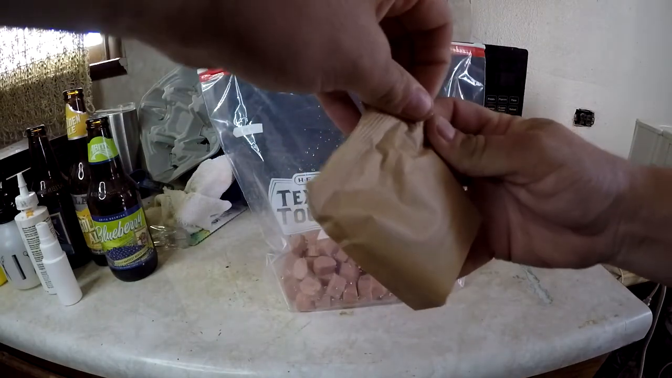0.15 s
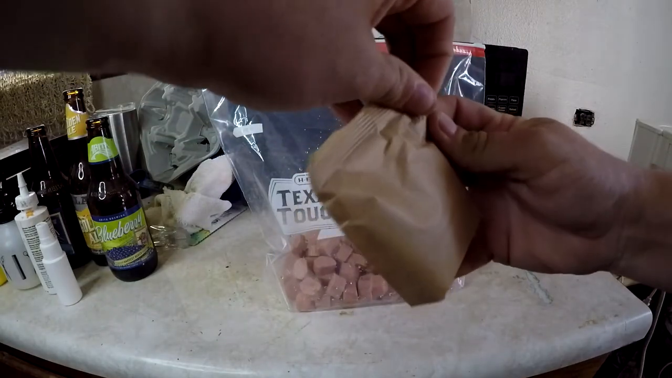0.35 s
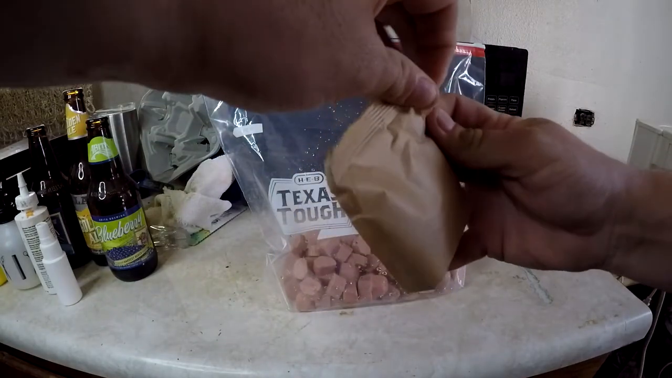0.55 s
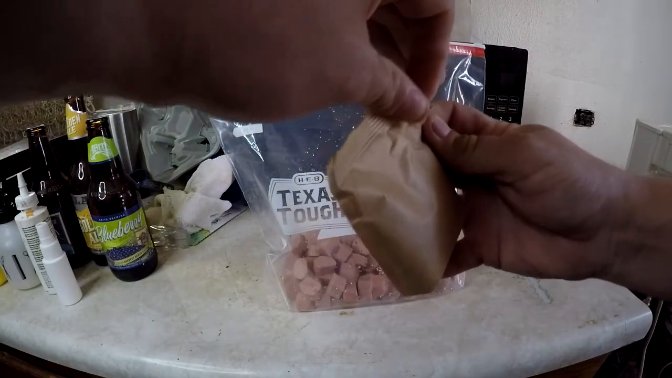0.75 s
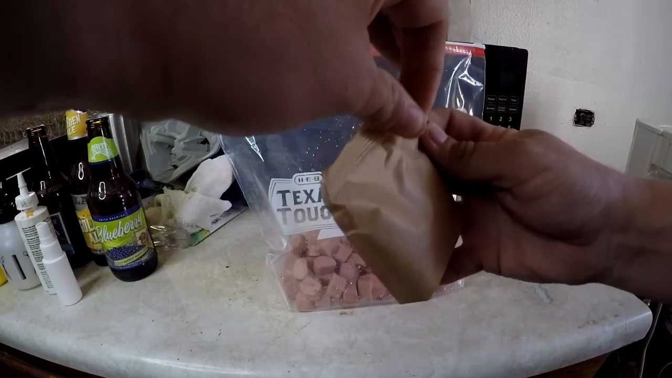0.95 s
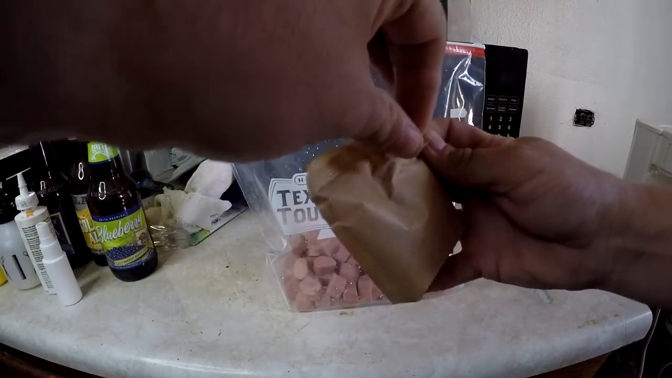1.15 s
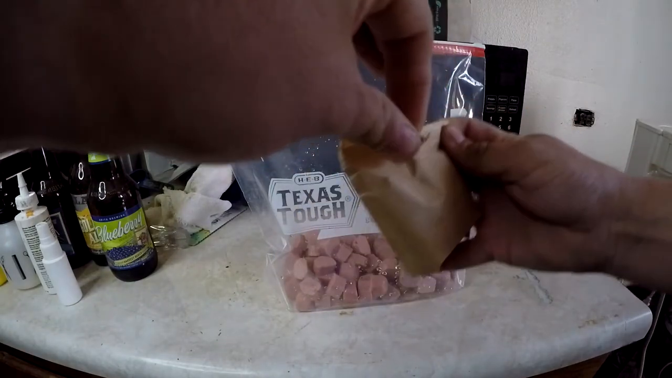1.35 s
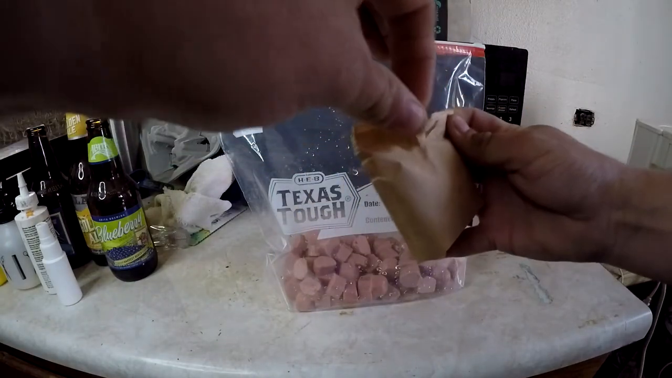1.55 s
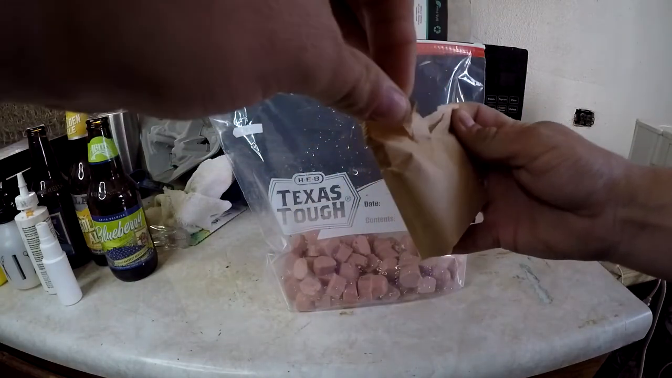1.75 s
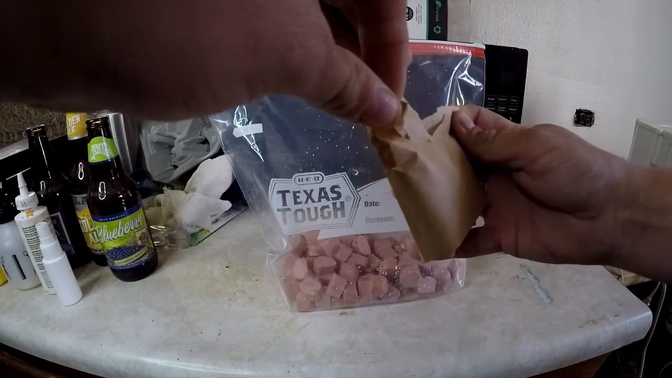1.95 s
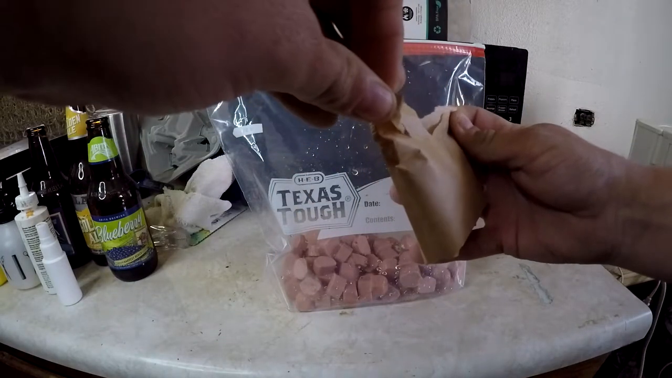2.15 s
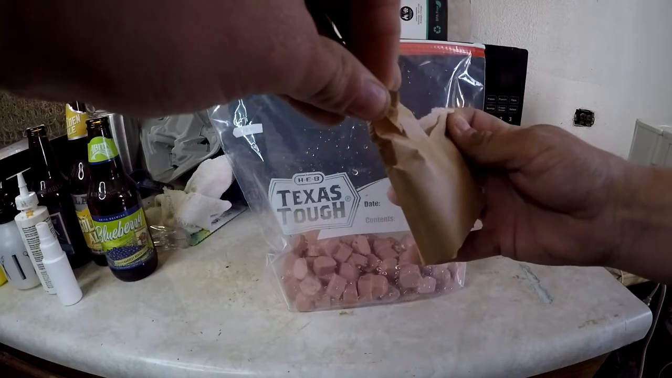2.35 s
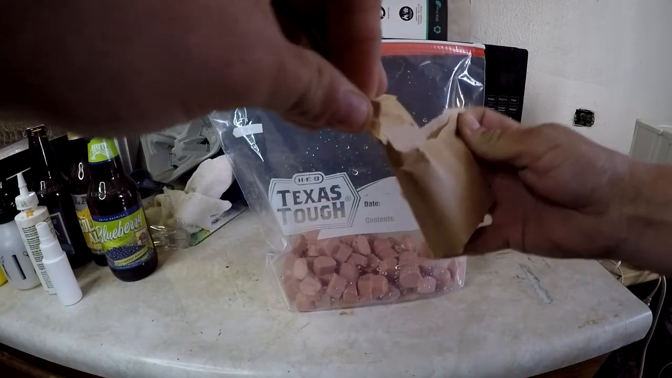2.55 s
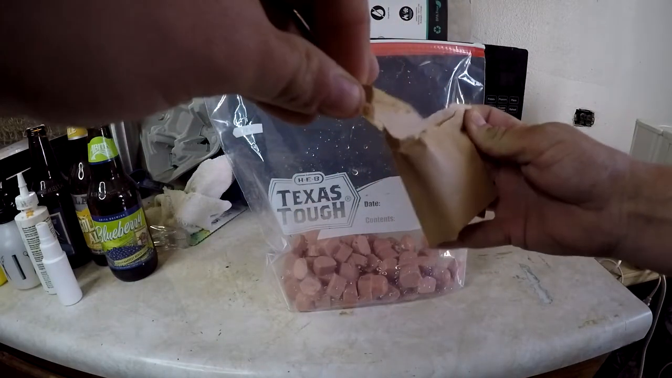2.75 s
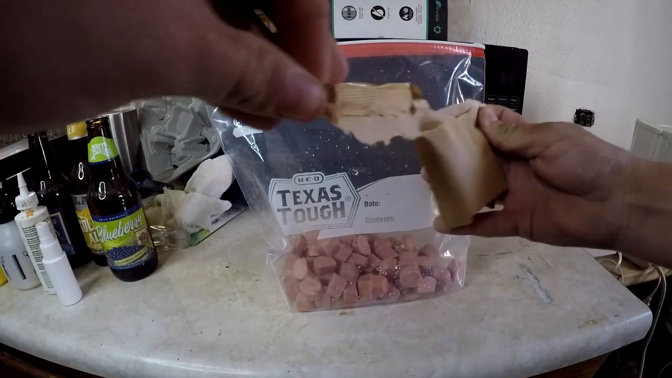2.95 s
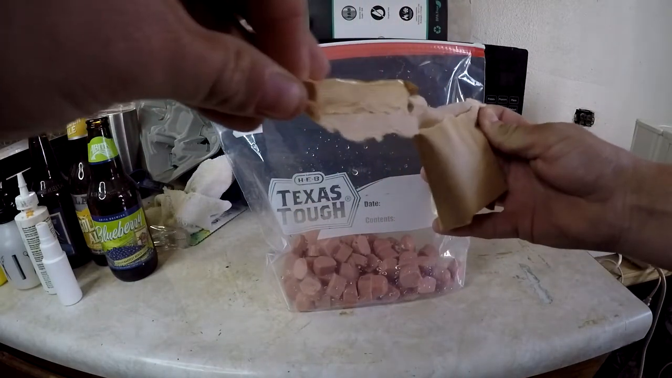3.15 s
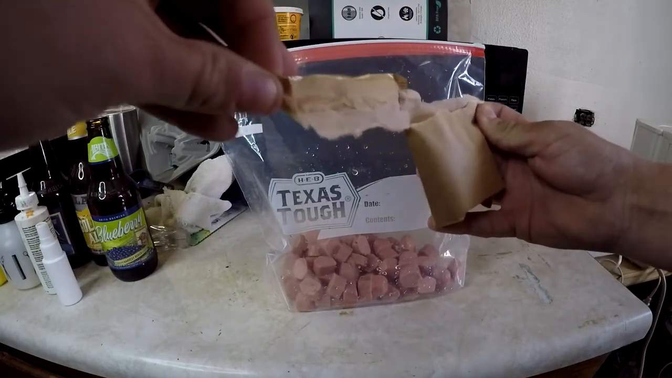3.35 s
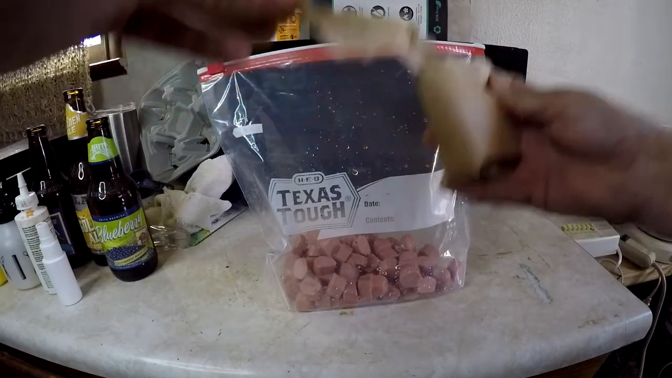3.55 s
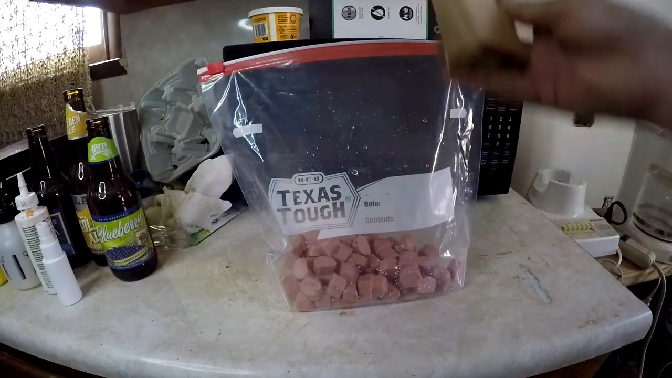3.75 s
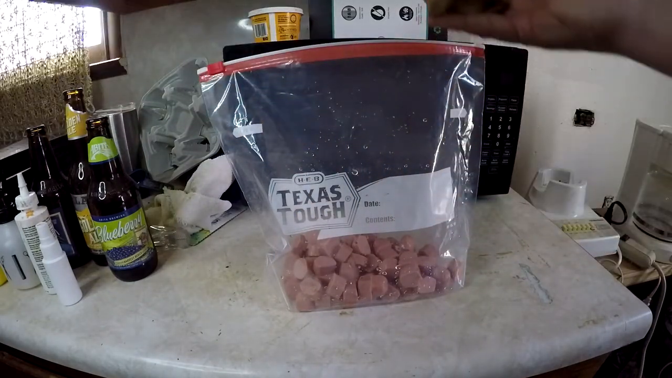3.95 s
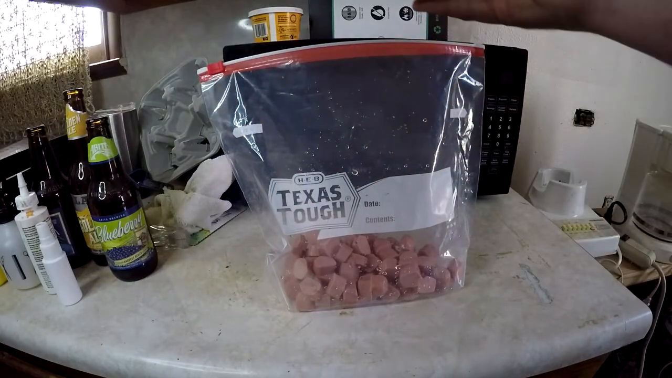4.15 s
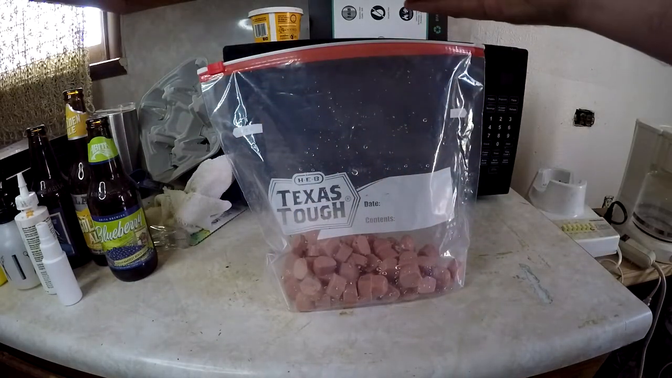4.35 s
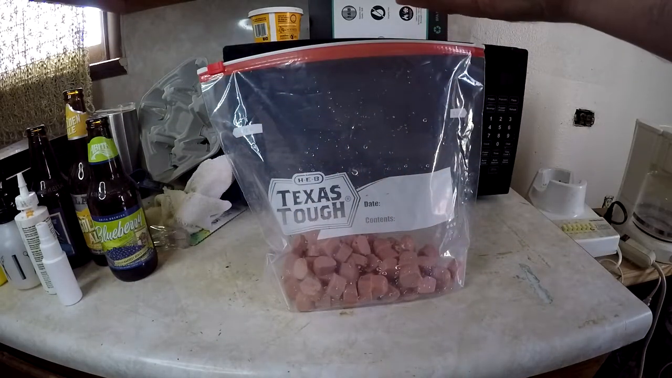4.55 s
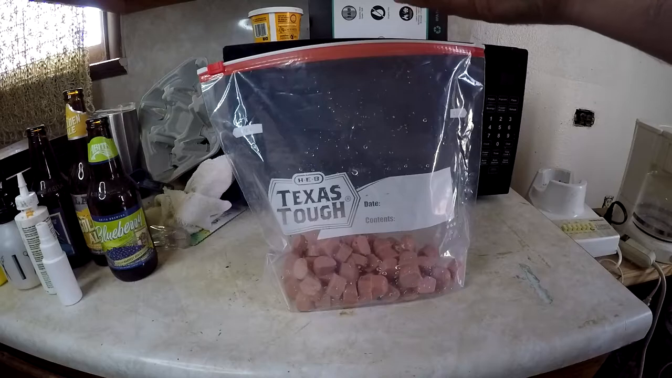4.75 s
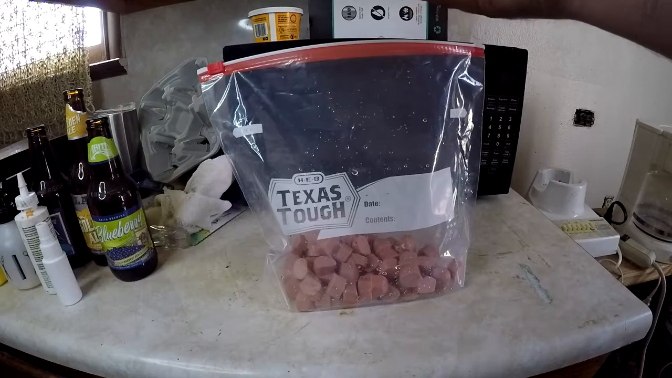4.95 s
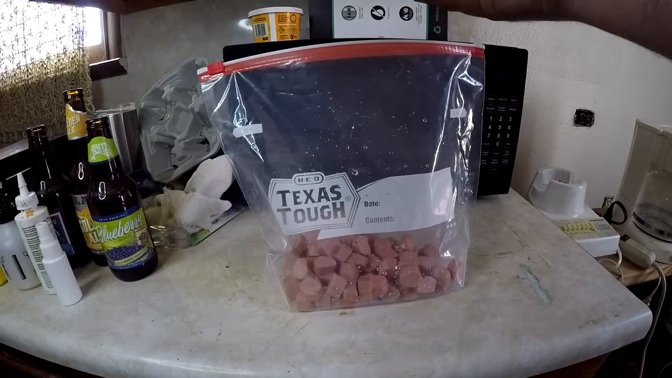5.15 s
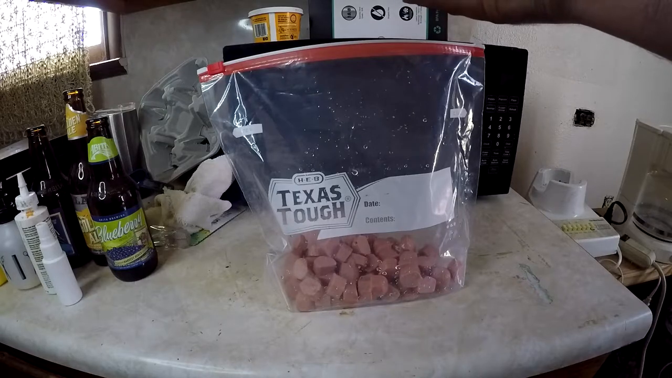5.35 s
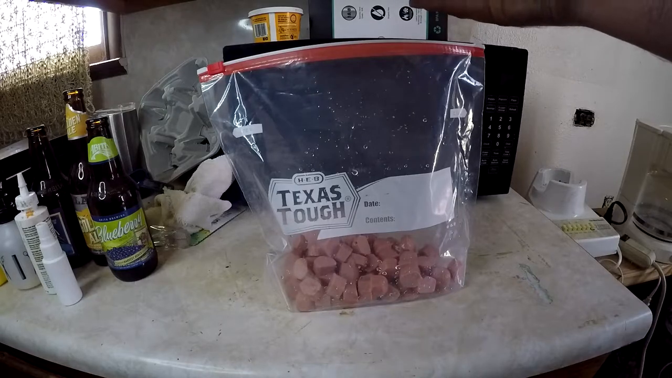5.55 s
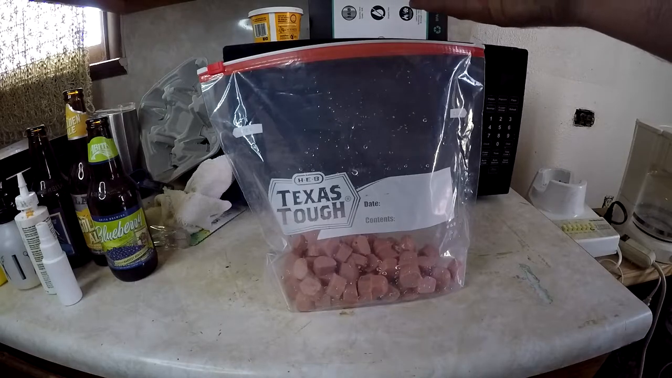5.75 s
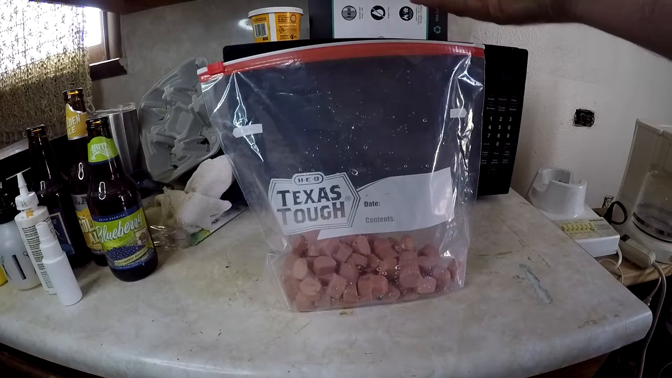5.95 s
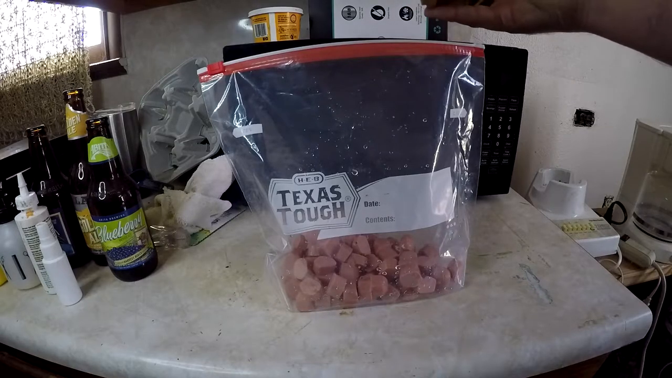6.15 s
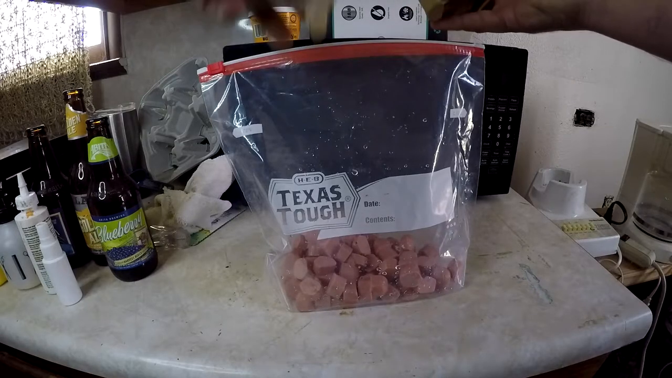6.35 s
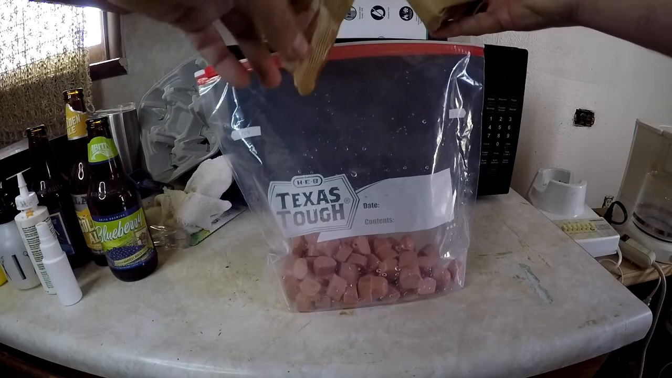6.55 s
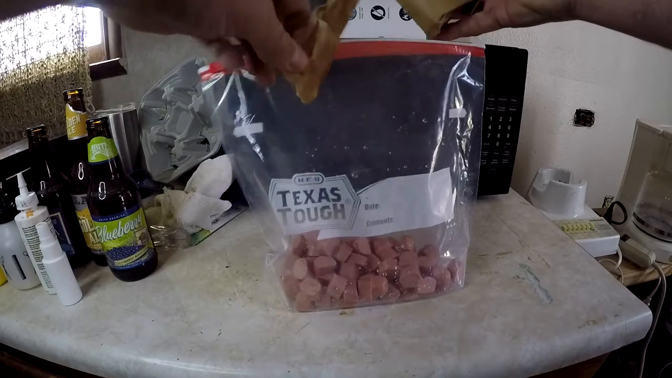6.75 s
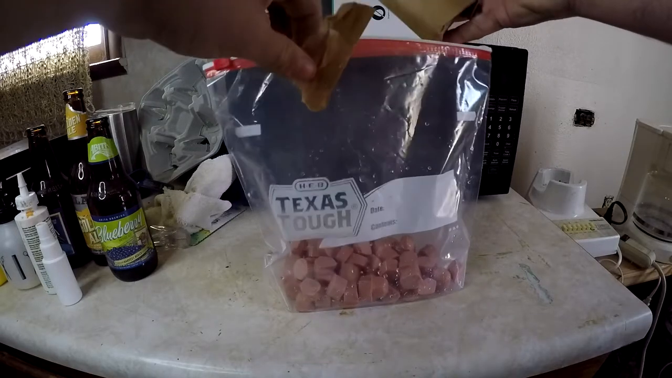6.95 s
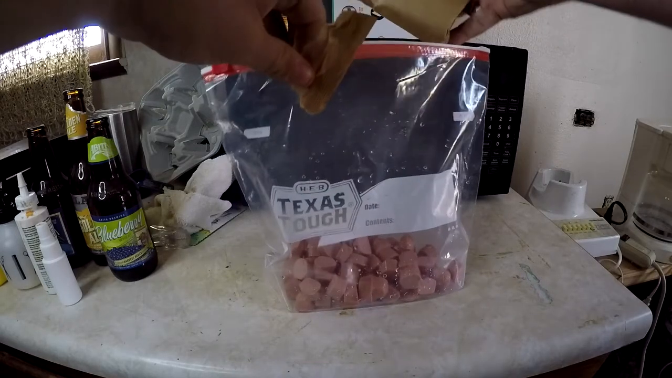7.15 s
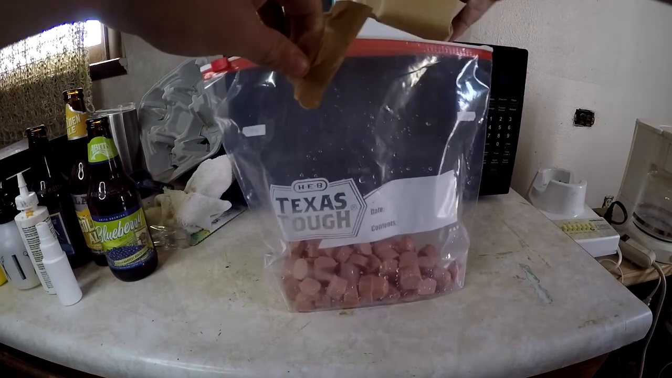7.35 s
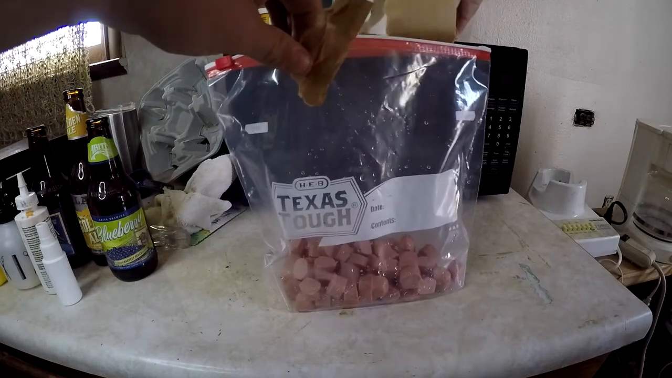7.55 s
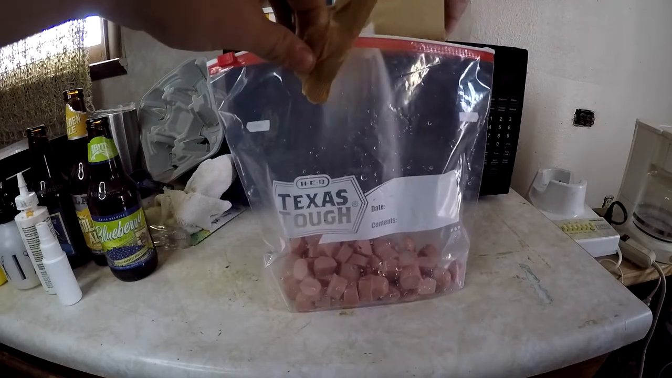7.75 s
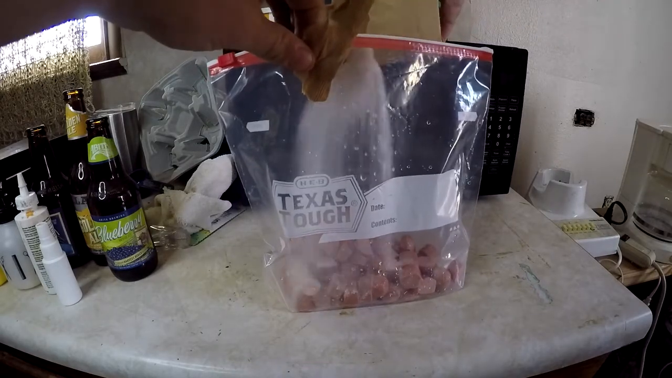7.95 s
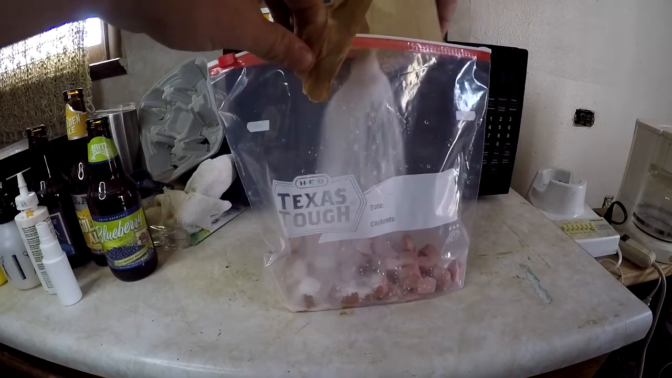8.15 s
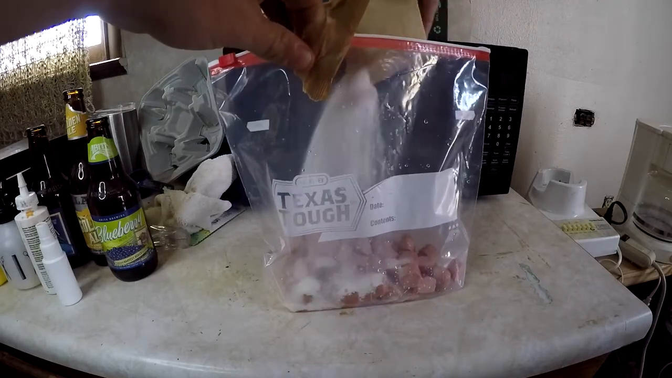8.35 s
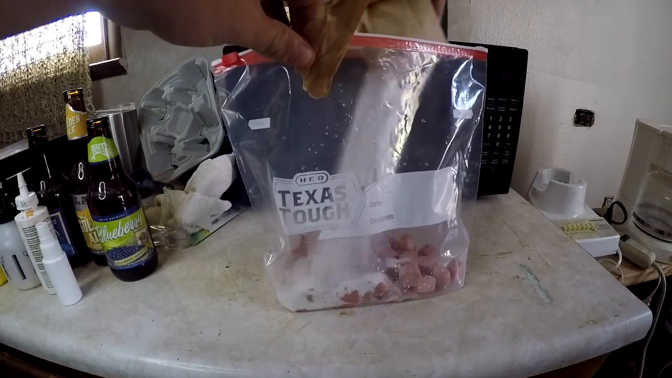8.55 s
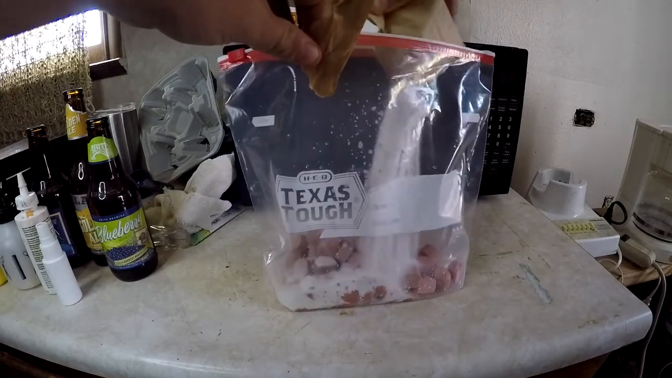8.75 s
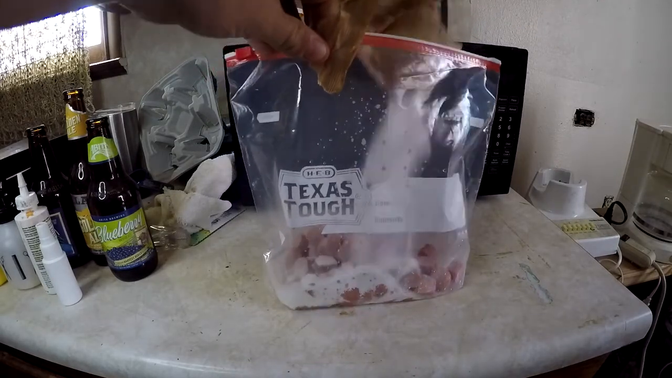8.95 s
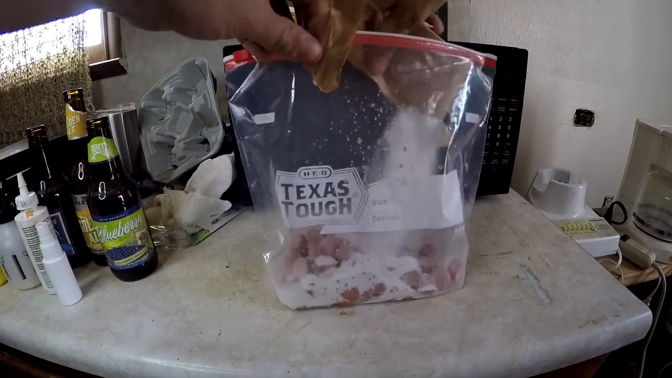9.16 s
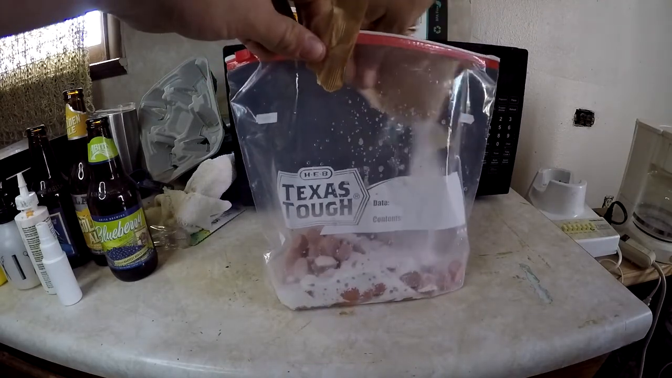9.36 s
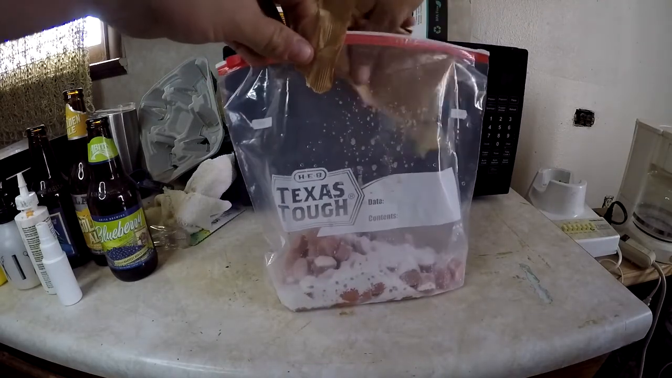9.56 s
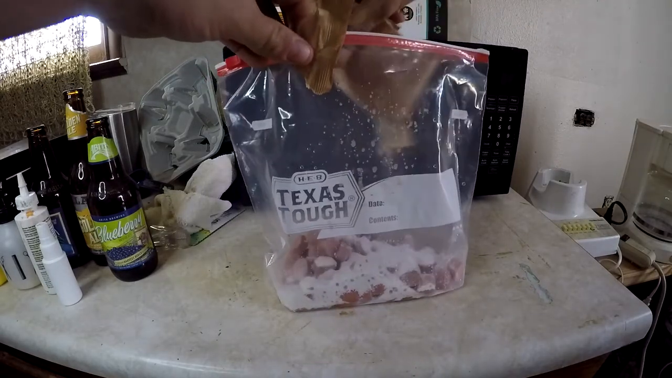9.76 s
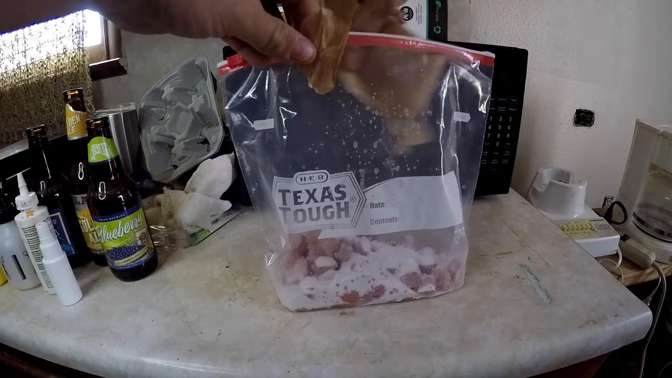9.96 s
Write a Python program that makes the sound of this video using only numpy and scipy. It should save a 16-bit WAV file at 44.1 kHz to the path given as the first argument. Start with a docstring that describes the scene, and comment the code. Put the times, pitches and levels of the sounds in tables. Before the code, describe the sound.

Crisp paper packet crinkled and torn close up in a kitchen, then sparser crackles, and powder hissing into a plastic bag.

```python
"""Hands crinkle and tear a paper packet close to one microphone in a kitchen: creases buckle as clicks
that ring the sheet briefly, loudest in the first three seconds, then sparser, with soft low bumps.
From about five seconds the packet's hollow ring fades as the hands turn to a plastic bag, a duller film.
From seven seconds powder pours in, its grains fusing to a hiss on the film while the sheets still crackle.
Throughout, filtered noise makes a low rumble and a faint steady hiss, and the room adds a short tail."""
import sys
import numpy as np
from scipy import signal
from scipy.fft import rfft, irfft
from scipy.io import wavfile

SR = 44100
rng = np.random.default_rng(int(sys.argv[2]) if len(sys.argv) > 2 else 0)


def wav_record(signal):
    """Record a signal, one row per channel, as 16-bit PCM in the file named by sys.argv[1]."""
    frames = np.transpose(np.atleast_2d(signal))
    bounded = np.clip(frames, -1, 1)
    # unit amplitude maps onto the largest positive 16-bit level
    quanta = np.round(bounded * 32767).astype(np.int16)
    wavfile.write(sys.argv[1], SR, quanta)


N = 441000

# loud buckles of paper and film:
# (time [s], relative peak level [dB], pitch [Hz], relative sheen of the treble [dB])
SNAP_EVENTS = [(0.014, -20.5, 920, -42), (0.311, -45, 6440, -12), (0.397, -9.5, 2710, -19),
               (0.428, -30, 5680, -23), (0.443, -15, 6080, -25), (0.503, -18, 5570, -23),
               (0.554, -16, 5890, -17), (0.563, -13.5, 5900, -21), (0.658, -19.5, 6100, -11),
               (0.702, 0.5, 3900, -32), (0.719, 2.5, 3200, -19), (0.787, -11.5, 3580, -26),
               (0.82, -8.5, 3340, -14), (0.832, -13, 3300, -21), (0.949, -49, 2330, -25),
               (1.041, -15.5, 3360, -19), (1.061, -16.5, 6620, -13), (1.076, -17, 3300, -17),
               (1.096, -16, 2750, -29), (1.109, -8, 3820, -26), (1.121, 5, 2680, -31),
               (1.165, -5.5, 4540, -6), (1.216, -5, 3670, -14.5), (1.231, -12, 5240, -26),
               (1.289, 0, 4200, -19), (1.309, -1, 4040, -15), (1.337, 4, 4200, -30),
               (1.411, -12, 4260, -17), (1.463, -23.5, 5180, -12), (1.517, -23, 3430, -11),
               (1.561, -11, 4240, -22), (1.6, -14.5, 4030, -29), (1.704, -16, 5940, -8),
               (1.733, -16, 3410, -22), (1.784, -18, 2600, -31), (1.814, -21.5, 4450, -8),
               (1.876, -13, 790, -23), (1.922, -28, 2600, -5), (1.941, -16.5, 2240, -29),
               (1.975, -26, 2290, -17), (2.032, -17.5, 5960, -15), (2.057, -19.5, 4210, -20),
               (2.091, 1, 2630, -18.5), (2.154, -21.5, 2480, -31), (2.343, -29.5, 5930, -12),
               (2.459, -20, 5580, -10.5), (2.467, -11.5, 4180, -16), (2.484, -4, 3890, -11.5),
               (2.505, -4, 4850, -24), (2.512, -9.5, 5940, -23), (2.563, -22, 2200, -19),
               (2.646, -20, 2780, -13), (2.665, -18, 3900, -22), (2.709, -17, 3800, -25),
               (2.728, -24, 4800, -13.5), (2.74, -19, 3960, -11), (2.764, -22, 3140, -17.5),
               (2.819, -14, 5130, -7.5), (2.831, -24, 3120, -7.5), (2.852, -8, 4890, -11),
               (2.859, -10, 2625, -14.5), (2.915, -16, 2770, -20.5), (2.956, -20, 4130, -14.5),
               (2.992, -11, 3880, -19), (3.161, -34, 5700, -2), (3.173, -41, 12600, -4),
               (3.207, -33, 3590, -12), (3.219, -28, 5320, -16), (3.27, -43, 4220, -14),
               (3.252, -29.5, 895, -10), (3.336, -21.5, 790, -13.5), (3.349, -22.5, 3540, -25),
               (3.435, -33.5, 954, -42.5), (3.487, -43, 3340, -27.5), (3.646, -42, 4130, -27.5),
               (3.667, -34.5, 3460, -21), (3.747, -45, 3550, -19), (3.724, -29, 3480, -17.5),
               (3.798, -29.5, 920, -20), (3.841, -29.5, 1540, -12), (3.977, -24, 1400, -5.5),
               (4.013, -34.5, 2230, -20), (4.36, -32, 4300, -9), (4.417, -38, 2760, -18),
               (4.514, -39, 1660, -24), (4.63, -31, 2300, -34), (4.643, -19, 970, -44),
               (4.681, -20, 3530, -15.5), (4.69, -33, 2920, -29), (4.704, -24, 1760, -34),
               (4.718, -23, 2910, -27), (4.734, -27, 3490, -27), (4.802, -39, 4000, -14),
               (4.822, -23, 3200, -28), (4.853, -32, 2950, -32), (4.944, -37.5, 1620, -5),
               (5.025, -26.5, 1190, -39), (5.046, -14, 950, -31), (5.069, -24, 940, -15),
               (5.118, -39, 3180, -2), (5.145, -38, 5510, -14), (5.165, -39, 3360, -14),
               (5.199, -39, 5100, -8), (5.212, -9.5, 4140, -26), (5.241, -23.5, 1510, -24.5),
               (5.366, -32, 1500, -13), (5.38, -6.5, 3120, -16), (5.428, -5.5, 2720, -26),
               (5.498, -17.5, 4560, -30), (5.51, -9.5, 930, -41.5), (5.546, -17.5, 2730, -14),
               (5.631, -26, 2600, -52.5), (5.676, -32.5, 1590, -36.5), (5.791, -25, 1010, -35.5),
               (5.814, -16.5, 7050, -17), (5.85, -33, 1400, -26), (5.97, -14, 4290, -10),
               (5.983, -9.5, 5200, -13), (6.011, -2.5, 2580, -29), (6.611, -28.5, 1216, -47),
               (6.745, -36, 1530, -33.5), (6.794, -26, 1080, -38), (6.806, -24, 1400, -41),
               (6.879, -20.5, 3640, -37), (6.944, -18.5, 1580, -41), (6.976, -11.5, 2480, -21.5),
               (7, -21, 1390, -37), (7.034, -25, 3700, -40), (7.055, -25, 1210, -38),
               (7.071, -14.5, 4100, -29), (7.119, -32, 1290, -29), (7.136, -36, 1400, -30),
               (7.159, -28.5, 1230, -33), (7.196, -31, 2900, -32), (7.244, -30, 1470, -37),
               (7.319, -29, 1510, -38), (7.324, -39, 1010, -35), (7.396, -21, 1450, -54),
               (7.662, -18, 3700, -33), (8.041, -19, 3400, -16), (8.677, -20, 1190, -30),
               (8.745, -9.5, 1990, -26), (8.95, -17.5, 2180, -10), (8.978, -8, 2420, -18),
               (9.07, -13.5, 1420, -24), (9.135, -17, 2610, -12), (9.199, -15, 1200, -40),
               (9.24, -15.5, 1270, -38), (9.255, -16, 1290, -21), (9.315, -10.5, 2030, -29),
               (9.414, -16.5, 1280, -27), (9.536, -7, 3440, -32), (9.947, -27.5, 1520, -29.5)]
# powder stream: (time [s], hiss level [dB])
POUR_LEVEL = [(7.3, -65.5), (7.55, -54), (7.88, -58), (8.0, -35.5), (8.3, -44), (8.42, -45.5),
              (8.52, -36.5), (8.68, -46.5), (8.97, -40), (9.05, -45), (9.1, -41), (9.31, -43),
              (9.53, -47.5), (9.62, -68), (9.71, -46.5), (9.83, -61.5), (9.87, -50), (9.92, -63.5),
              (10.0, -51)]
# what the hands hold, bright paper or dull film: (time [s], fidgeting between squeezes [dB],
# relative body of the lows [dB], relative sheen of the treble [dB])
HELD_SHEET = [(0, -99, -11, 6), (.45, -58, -17, -1), (1.5, -78, -28.5, 0.5), (1.95, -45, -9, 5),
              (2.4, -73, -17.5, -2), (3.0, -72, -16.5, 2.5), (3.45, -75.5, -5, 0.5), (4.55, -58, -14, -5.5),
              (5.1, -74, -27, 1.5), (6.0, -67.5, -24.5, 4), (6.45, -83, 13, -19), (6.9, -55, 0, -23),
              (7.4, -62, 3.5, -62), (7.5, -78, 14, -16), (7.9, -50.5, -21, 0), (8.3, -49, -7.5, -3),
              (8.7, -47, -3, -11), (9.45, -40, -5.5, -6), (9.75, -49.5, -5.5, 4), (10, -71, -6.5, -38)]
PITCHES = np.geomspace(220, 14400, 26)   # pitches the sheets ring at, Hz


def amp(db):
    """Gain of a level in dB."""
    return 10 ** (np.asarray(db) / 20)


def rms_one(x):
    """Scaled to an rms of 1."""
    return x / np.sqrt(np.mean(x ** 2) + 1e-20)


def in_time(rows, silent=None):
    """Columns of a curve at every sample; `silent` is the value ahead of its first point."""
    s, *columns = np.transpose(rows)
    return [np.interp(np.arange(N) / SR, s, c, left=silent) for c in columns]


def at_hz(points, hz):
    """A spectrum read on a log-frequency axis."""
    return np.interp(np.log(hz), np.log(np.array(points)[:, 0]), np.array(points)[:, 1])


def drift(rate_hz):
    """Slow chance with spread 1: noise smoothed by two equal poles at rate_hz, made at every 40th sample."""
    r = np.exp(-2 * np.pi * rate_hz * 40 / SR)
    noise = rng.standard_normal(N // 40 + 2002)
    slow = signal.lfilter([1], [1, -2 * r, r * r], noise)[2000:]     # skip the filter's start
    return np.interp(np.arange(N) / 40, np.arange(len(slow)), rms_one(slow))


def coloured(x, spectrum):
    """White input given a spectrum; rms 1."""
    hz = np.maximum(np.arange(N // 2 + 1) * SR / N, 1)
    return rms_one(irfft(rfft(x) * amp(at_hz(spectrum, hz)), N))


def ring(clicks, hz, t60):
    """A click sets a sine ringing; its start is rounded, so a low pitch carries no treble."""
    r, w = amp(-60 / (t60 * SR)), 2 * np.pi * hz / SR
    soft = np.exp(-2 * w)
    poles = np.convolve([1, -2 * r * np.cos(w), r * r], [1, -soft])
    return signal.lfilter([0, np.sin(w) * (1 - soft)], poles, clicks + 1e-18)


def steady_hiss():
    """Faint coloured noise at a constant level."""
    # colour of the hiss: (frequency [Hz], relative density [dB])
    hiss_colour = [(120, -19.5), (200, -9), (452, -6.5), (593, -5), (700, -14.5), (3200, -15), (7920, -23),
                   (11400, -25), (15200, -22.5)]
    return amp(-62) * coloured(rng.standard_normal(N), hiss_colour)


def rumble(lumpy_db):
    """Lumpy low noise whose level drifts at random around a curve."""
    # rumble, swelling when the counter is jostled: (time [s], level [dB])
    rumble_level = [(0.0, -52.5), (1.36, -55), (2.34, -57), (2.92, -53), (3.34, -57), (4.32, -55.5),
                    (5.24, -55), (5.48, -55.5), (6.29, -56.5), (7.35, -47.5), (7.88, -54), (8.38, -54),
                    (9.05, -43.5), (10.0, -52)]
    # colour of the rumble: (frequency [Hz], relative density [dB])
    rumble_colour = [(12, -39), (20, 5.5), (36, 3.5), (76, -7), (108, -7.5), (247, -16), (300, -36.5),
                     (390, -56.5), (660, -120)]
    level_db = in_time(rumble_level)[0] + lumpy_db * drift(rate_hz=6.1)
    return amp(level_db) * coloured(rng.standard_normal(N), rumble_colour)


def kitchen(x):
    """Quick reflections off counter, bag and hands, then a dense tail whose treble dies first."""
    late_t60_s, treble_t60_s, late_db = 0.34, 0.11, -15
    early_t60_s, early_db = 0.03, -12
    t = np.arange(SR // 2) / SR
    noise = rng.standard_normal((3, len(t)))
    low_pass = signal.butter(1, 3000, fs=SR, output="sos")
    high_pass = signal.butter(1, 3000, "high", fs=SR, output="sos")
    low = signal.sosfilt(low_pass, noise[0]) * amp(-60 * t / late_t60_s)
    high = signal.sosfilt(high_pass, noise[1]) * amp(-60 * t / treble_t60_s)
    late = (low + high) * np.clip(t / 0.0033, 0, 1)     # reflections build up over the first wall paths
    early = noise[2] * amp(-60 * t / early_t60_s)
    tail = amp(late_db) * late / np.linalg.norm(late)
    tail = tail + amp(early_db) * early / np.linalg.norm(early)
    tail[0] = 1     # direct sound
    return signal.oaconvolve(x, tail)[:N]


def bumps():
    """A soft contact: a rounded push rings one low pitch."""
    # bumps of hands, packet and powder heaps:
    # (time [s], relative peak level [dB], pitch [Hz], length to -60 dB [cycles])
    bump_events = [(1.117, -21, 373, 16), (1.585, -31, 460, 17), (2.509, -21, 350, 15),
                   (2.853, -19.5, 333, 19), (3.345, -41, 143, 31), (3.657, -45, 159, 9.9),
                   (4.01, -41, 114, 12), (4.651, -40.5, 332, 34), (6.835, -34, 328, 60),
                   (7.001, -33.5, 139, 15), (8.349, -42, 306, 18), (8.858, -31, 171, 14),
                   (9.599, -41.5, 108, 14)]
    out = np.zeros(N)
    for s, peak_db, hz, cycles in bump_events:
        push = np.bincount([round(s * SR)], [amp(peak_db)], N)
        out += ring(push, hz, cycles / hz)
    return signal.sosfilt(signal.butter(2, 500, fs=SR, output="sos"), out)


def powder(grains_per_s):
    """Thousands of grains patter on the film and fuse to a hiss."""
    # colour of the patter: (frequency [Hz], relative density [dB])
    powder_colour = [(120, -31), (200, -22.5), (377, -24.5), (751, -32), (1300, -8.5), (2000, -17.5),
                     (3090, -11.5), (3500, -8), (3910, -10.5), (10600, -20), (15200, -22.5)]
    sizes = amp(2 * rng.exponential(1, N)) * rng.choice([-1, 1], N)
    grains = sizes * (rng.random(N) < grains_per_s / SR)
    hiss_db, = in_time(POUR_LEVEL, silent=-100)
    flicker_db = 1.3 * drift(rate_hz=20)
    return amp(hiss_db + flicker_db) * coloured(grains, powder_colour)


def ends(body_db, sheen_db):
    """dB added to each pitch of the sheet: body fades in under 1.4 kHz, sheen above 5.5 kHz."""
    low = np.clip(np.log2(1400 / PITCHES) * 1.5, 0, 1)
    high = np.clip(np.log2(PITCHES / 5500) * 1.6, 0, 1)
    return np.outer(body_db, low) + np.outer(sheen_db, high)


def hump(hz, octaves, skirt_db):
    """dB of each pitch of the sheet when the one at hz stands out."""
    return np.maximum(-6 * (np.log2(PITCHES / hz[:, None]) / octaves) ** 2, skirt_db)


def sheet(at, strengths, cycles):
    """Clicks at the samples `at` ring all pitches, each by its strength; a small sheet sends out no bass."""
    dip_hz, dip_width_hz, dip_share = 580, 240, 0.65     # weak between body and crackle
    hollow_hz, hollow_width_hz, hollow_share = 950, 150, 0.9     # air in the packet rings along
    hollow_gone_s = (5.2, 6.4)     # it fades as the hands turn to the bag
    rings = sum(ring(np.bincount(at, strengths[:, k], N), hz, cycles / hz)
                for k, hz in enumerate(PITCHES))
    dip = signal.iirpeak(dip_hz, dip_hz / dip_width_hz, fs=SR)
    rings = rings - dip_share * signal.lfilter(*dip, rings)
    open_packet = np.interp(np.arange(N) / SR, hollow_gone_s, [1, 0])
    hollow = signal.iirpeak(hollow_hz, hollow_hz / hollow_width_hz, fs=SR)
    rings = rings + hollow_share * open_packet * signal.lfilter(*hollow, rings)
    return signal.sosfilt(signal.butter(2, 317, "high", fs=SR, output="sos"), rings)


def snaps(colour_db):
    """A large crease buckles: a broad crack with one pitch standing out, and a few aftershocks."""
    # the crack and its aftershocks: (delay before scatter [s], relative level [dB])
    aftershocks = ((0, 3), (.0015, -4), (.004, -9))
    body_top_db = -6     # snaps stay dry, however dull the sheet
    body_offset_db, body_db_per_octave, body_spread_db = -6.5, -3.5, 6.5     # deeper snaps have more body
    s, peak_db, hz, sheen_db = np.transpose(SNAP_EVENTS)
    body_db = np.minimum(in_time(HELD_SHEET)[1][(s * SR).astype(int)], body_top_db)
    body_db = body_db + body_db_per_octave * np.log2(hz / 3000)
    body_db = body_db + body_spread_db * rng.standard_normal(len(s))
    shape_db = hump(hz, octaves=0.28, skirt_db=-12.0) + ends(body_db + body_offset_db, sheen_db + 22.0)
    shape_db = shape_db + peak_db[:, None] - 10.0
    out = 0
    for lag_s, after_db in aftershocks:
        draw = rng.standard_normal((len(s), 27))     # 26 pitches and the scatter of the delay
        at_s = s + lag_s * amp(3.3 * draw[:, 26])
        at = np.round(at_s * SR).astype(int).clip(0, N - 1)
        signs = np.sign(rng.standard_normal((len(s), 26)))
        plain = amp(shape_db + after_db)
        own = amp(shape_db + colour_db * draw[:, :26])     # no two snaps ring the pitches alike
        # colour leaves the strength alone
        own = own * np.sqrt((plain ** 2).sum(1) / (own ** 2).sum(1))[:, None]
        out = out + sheet(at, own * signs, cycles=18.0)
    return out


def clumps(per_s, fade_s, between, at_snap):
    """A fold gives way at once, then settles: sudden rises with fading tails, also at each snap; rms 1."""
    starts = (rng.random(N) < per_s / SR) * rng.random(N)
    starts[[round(row[0] * SR) for row in SNAP_EVENTS]] = at_snap
    tails = signal.lfilter([1], [1, -np.exp(-1 / (fade_s * SR))], starts)
    return rms_one(between + tails)


def handling():
    """Each squeeze swells fast, holds and lets go slowly; the strongest sets the pitch."""
    # squeezes, pulls and rips:
    # (time at full force [s], hold [s], relative crackle level [dB], pitch that stands out [Hz])
    squeezes = [(0, 0.017, -47.5, 4370), (0.085, 0.036, -47.5, 6000), (0.319, 0.12, -48, 5000),
                (0.419, 0.073, -28, 5200), (0.562, 0.0078, -29, 5870), (0.632, 0.065, -46.5, 4450),
                (0.74, 0.12, -32.5, 3200), (0.804, 0.0076, -34.5, 3370), (0.956, 0.014, -50.5, 3630),
                (1.083, 0.064, -24, 3330), (1.22, 0.11, -21.5, 3870), (1.358, 0.035, -28, 3970),
                (1.523, 0.048, -37.5, 3760), (1.557, 0.089, -33, 3600), (1.66, 0.11, -38.5, 4300),
                (1.893, 0.026, -45, 2920), (1.953, 0.05, -38.5, 2920), (2.104, 0.036, -40.5, 2530),
                (2.211, 0.015, -47, 2920), (2.333, 0.0054, -65, 5000), (2.437, 0.018, -42.5, 4080),
                (2.499, 0.026, -19.5, 3670), (2.676, 0.11, -32, 4100), (2.847, 0.012, -21, 4930),
                (2.899, 0.065, -23, 5020), (3.133, 0.028, -54, 5000), (3.218, 0.025, -47, 4370),
                (3.655, .01, -65, 3300), (3.75, 0.016, -58.5, 3280), (3.796, 0.038, -54, 2000),
                (3.981, 0.011, -54, 3160), (4.28, 0.12, -55.5, 3420), (4.639, 0.019, -49, 1960),
                (4.706, 0.027, -47.5, 2740), (4.883, 0.076, -54, 5200), (5.055, 0.051, -53.5, 2700),
                (5.215, 0.041, -46.5, 3200), (5.397, 0.0062, -24, 3370), (5.516, 0.048, -56, 3000),
                (5.806, 0.078, -57, 5350), (5.98, 0.015, -25.5, 3420), (6.749, 0.035, -59.5, 1810),
                (6.825, 0.043, -49, 2950), (6.973, 0.022, -36, 1630), (7.05, 0.033, -47.5, 3460),
                (7.167, .04, -52.5, 1430), (7.24, 0.018, -48, 1520), (7.337, 0.033, -47, 1730),
                (7.945, 0.22, -38.5, 4300), (8.332, 0.017, -38.5, 3250), (8.496, 0.039, -45, 3960),
                (8.592, 0.015, -40, 2460), (8.838, 0.032, -35, 3360), (8.98, 0.033, -39.5, 2960),
                (9.095, 0.27, -38, 2730), (9.295, 0.041, -34, 2250), (9.4, 0.07, -69, 2950),
                (9.724, 0.044, -60, 3300), (9.859, 0.015, -43, 2830), (9.97, .03, -36.5, 2620)]
    rise_db_per_s, fall_db_per_s = 605.5, 269
    s, hold_s, db, hz = np.transpose(squeezes)[:, :, None]
    t = np.arange(0, N + 50, 50) / SR     # a point every 50 samples
    rise_db = rise_db_per_s * np.clip(s - t, 0, 1)
    fall_db = fall_db_per_s * np.clip(t - s - hold_s, 0, 1)
    power = amp(db - rise_db - fall_db) ** 2 + 1e-30
    total = power.sum(0)
    mean_hz = (power * hz).sum(0) / total
    squeeze_db, pitch = in_time(np.transpose([t, 10 * np.log10(total), mean_hz]))
    fidget_db, body_db, sheen_db = in_time(HELD_SHEET)
    level_db = 10 * np.log10(amp(squeeze_db) ** 2 + amp(fidget_db) ** 2)
    return level_db, body_db, sheen_db, pitch


def crackle(rub_db, spread_db, colour_db):
    """Small creases give way at random, in clumps, each with its own size and colour."""
    # colour of the crackle: (frequency [Hz], relative density [dB])
    sheet_colour = [(88, -45), (150, -44), (325, -2), (591, -6.5), (940, -12), (1700, -13.5), (2670, -6),
                    (3930, -7), (6010, -5), (7020, -15), (15200, -21)]
    scatter_octaves, largest_crease = 0.45, 2.6     # pitch of each crease; cap on its size, in spreads
    crisp_under_powder = 0.5     # share of the unevenness left while powder streams over the sheets
    level_db, body_db, sheen_db, hz = handling()
    at, chance = rng.integers(0, N, 40000), rng.random((40000, 2))     # 4000 creases a second may give way
    per_s = np.interp(level_db[at], [-60, -25], [450, 3000])     # harder handling, denser crackle
    pour_db = in_time(POUR_LEVEL, silent=-100)[0][at]
    crisp = np.interp(pour_db, [-68, -56], [1, crisp_under_powder])
    size = amp(crisp * spread_db * np.minimum(-np.log(chance[:, 1]), largest_crease))
    size = size / np.sqrt(np.mean(size ** 2) * per_s)     # density leaves the level alone
    size = size * clumps(per_s=75, fade_s=0.006, between=0.45, at_snap=0.9)[at] ** crisp
    buckles = chance[:, 0] < per_s / 4000
    size = amp(level_db[at]) * np.where(buckles, size, amp(rub_db))     # the others whisper as fingers slide
    colour = amp(colour_db * rng.standard_normal((40000, 26))) * rng.choice([-1, 1], (40000, 26))
    shape_db = at_hz(sheet_colour, PITCHES) + 20 * np.log10(PITCHES / 4000)
    shape_db = shape_db + ends(body_db[at] + 15, sheen_db[at] + 5.0)
    crease_hz = hz[at] * 2 ** (scatter_octaves * rng.standard_normal(40000))
    shape_db = shape_db + hump(crease_hz, octaves=0.38, skirt_db=-10.5)
    return sheet(at, size[:, None] * colour * amp(shape_db + 36.5), cycles=12.3)


def scene():
    """All sources at one microphone, copied to both channels."""
    near = bumps() + powder(grains_per_s=12000)
    near = near + snaps(colour_db=5) + crackle(rub_db=-39, spread_db=4.0, colour_db=6.0)
    mono = rumble(lumpy_db=2) + steady_hiss() + kitchen(near)
    return np.array([mono, mono])


def record(dry):
    """Peaks are rounded off by a tanh, then two steep low-passes cut the top."""
    ceiling = 0.9     # height the rounded peaks approach
    top = signal.ellip(12, .5, 45, 15250, fs=SR, output="sos")
    steep = signal.cheby2(14, 60, 16500, fs=SR, output="sos")
    return signal.sosfilt(np.vstack([top, steep]), ceiling * np.tanh(dry / ceiling))


dry = scene()
out = record(dry)
wav_record(out)
```